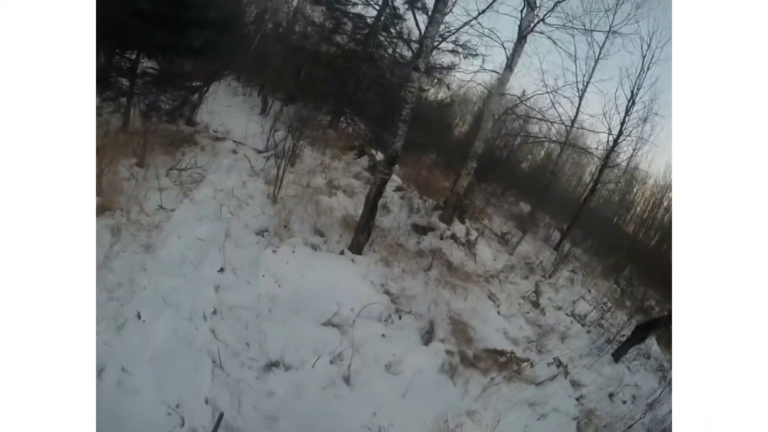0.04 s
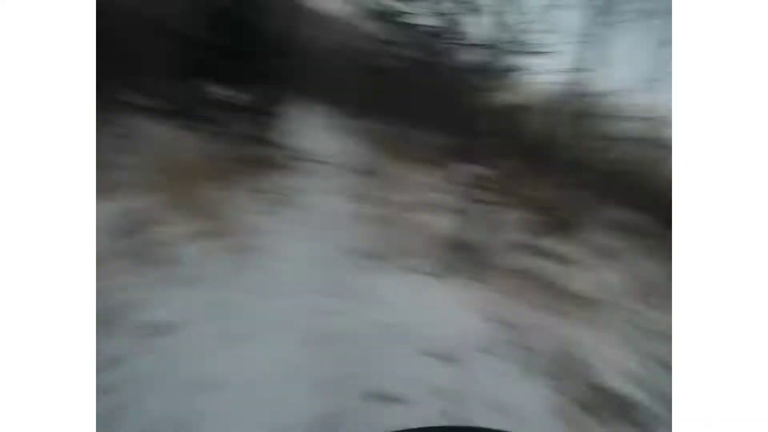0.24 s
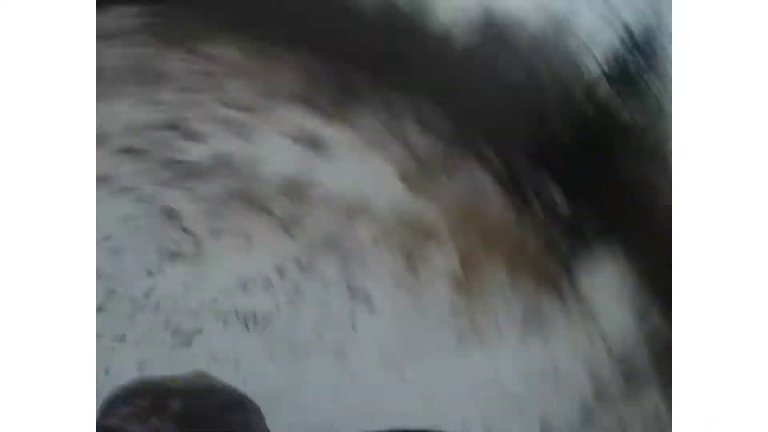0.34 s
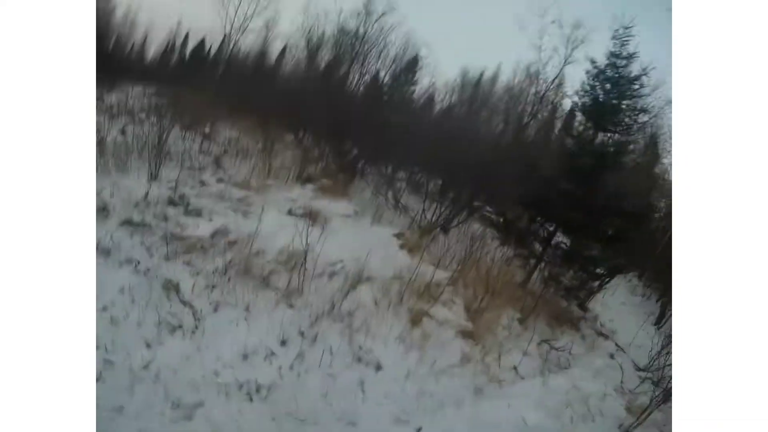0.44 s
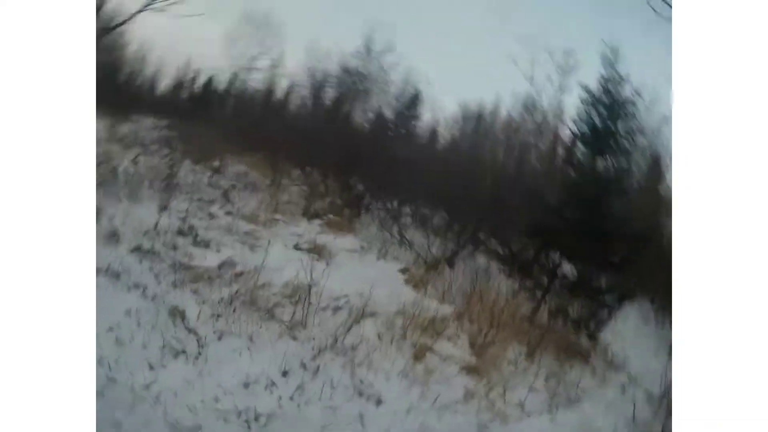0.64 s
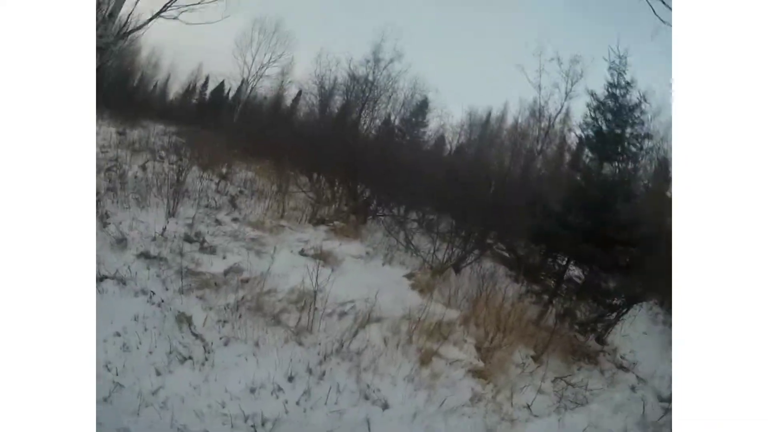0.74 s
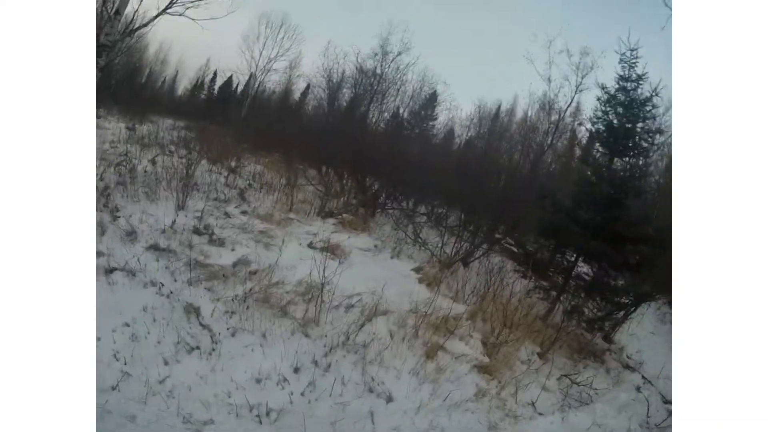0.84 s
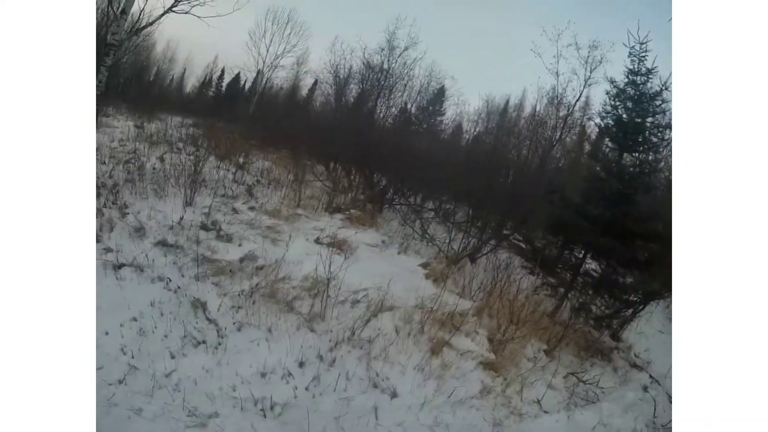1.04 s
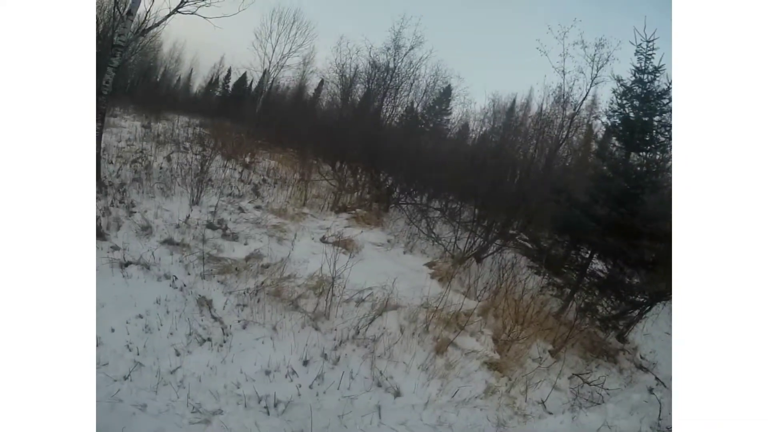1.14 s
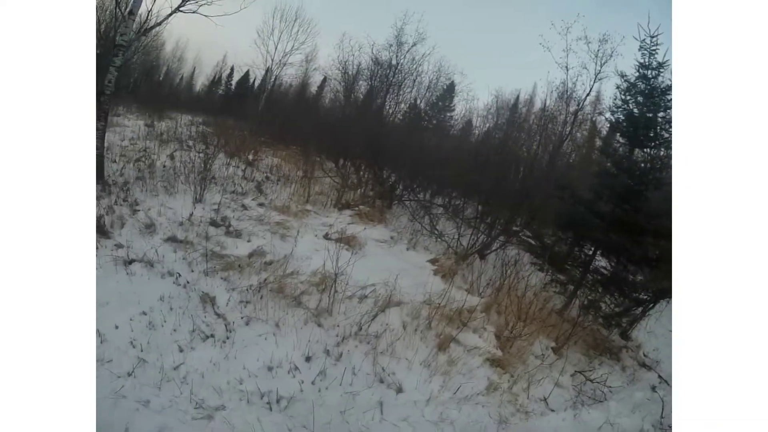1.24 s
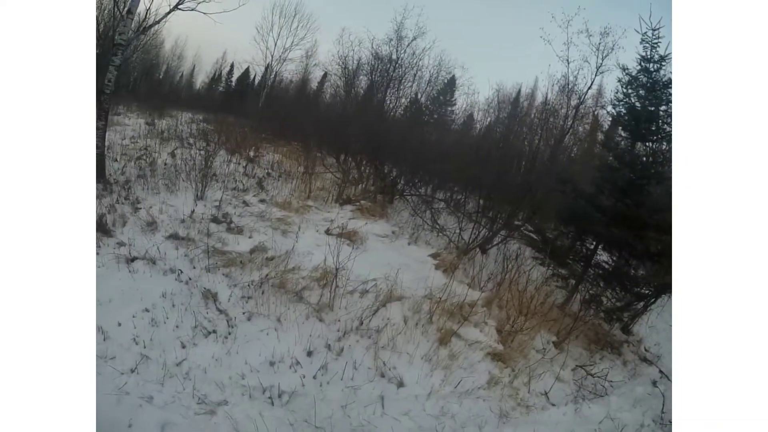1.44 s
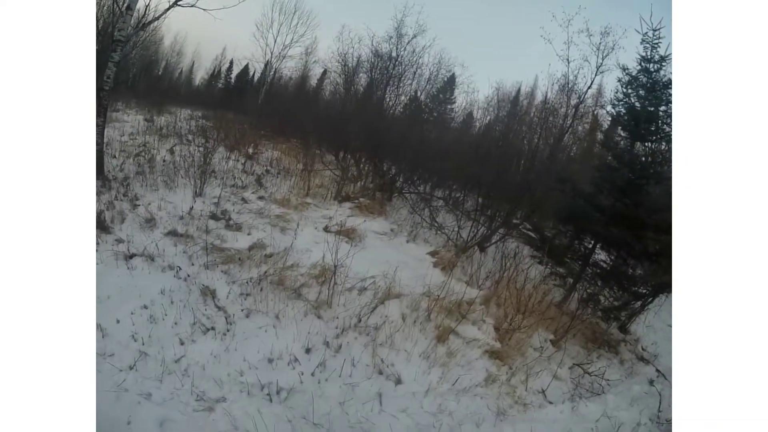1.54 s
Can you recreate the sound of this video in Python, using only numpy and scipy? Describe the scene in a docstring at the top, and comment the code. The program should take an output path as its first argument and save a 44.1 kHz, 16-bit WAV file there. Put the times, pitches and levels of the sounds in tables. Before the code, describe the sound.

Camera handling noise, right at the microphone, outdoors with no echo. Over a soft air rumble, rubbing on the plastic case swells at about 0.2 seconds with a knock and low thumps. One sharp click snaps at 0.3 seconds, with a faint chatter after it. Softer knocks and scuffs follow from 0.4 to 0.7 seconds and fade by 0.9, leaving faint wind hiss and rumble until about 1.6 seconds.

```python
"""A low rumble of air comes first, as a hand-held camera is swung round on a snowy woodland trail.
Something rubs and knocks on its plastic case, and the swing shoves the microphone into low thumps.
A hard part snaps once, sharply, with a second contact just after and a faint chatter.
The handling dies away within a second, leaving a faint hiss of wind over the soft rumble."""
import sys
import numpy as np
from scipy import signal
from scipy.fft import rfft, irfft
from scipy.io import wavfile

SR = 44100
rng = np.random.default_rng(int(sys.argv[2]) if len(sys.argv) > 2 else 0)


def generate_wav(sig):
    """Save sig (samples, or channels by samples) to the path in sys.argv[1] as 16-bit PCM at SR."""
    pcm = np.round(np.clip(np.atleast_2d(sig).T, -1, 1) * 32767).astype(np.int16)
    wavfile.write(sys.argv[1], SR, pcm)


N = 70560
TIME = np.arange(N) / SR


def from_db(db):
    """Decibels to gain."""
    return 10 ** (np.asarray(db) / 20)


def unit_rms(x):
    """Scale to rms 1."""
    return x / np.sqrt(np.mean(x ** 2) + 1e-20)


def envelope(rows):
    """Gain over time from rows of t/s, level/dB."""
    return from_db(np.interp(TIME, *np.transpose(rows)))


def coloured(noise, spectrum):
    """EQ a steady noise with rows of f/Hz, level/dB, then scale to rms 1."""
    hz, db = np.transpose(spectrum)
    bins_hz = np.maximum(np.fft.rfftfreq(N, 1 / SR), 1)
    eq = from_db(np.interp(np.log(bins_hz), np.log(hz), db))
    return unit_rms(irfft(rfft(noise) * eq, N))


def band(x, low_hz, high_hz, order=2):
    """High-pass, then low-pass."""
    for hz, kind in ((low_hz, "high"), (high_hz, "low")):
        x = signal.sosfilt(signal.butter(order, hz, kind, fs=SR, output="sos"), x + 1e-18)
    return x


def softened(x, band_hz):
    """A soft contact wakes only one band of the modes."""
    return signal.sosfilt(signal.butter(2, band_hz, "band", fs=SR, output="sos"), x + 1e-18)


def struck(start, modes):
    """Decaying sines of alternating sign, set off by one blow."""
    age = np.maximum(TIME - start, 0)
    ring = 0
    for k, (hz, db, t60) in enumerate(modes):
        decay = np.exp(-np.log(1000) * age / t60)
        ring += (-1) ** k * from_db(db) * decay * np.sin(2 * np.pi * hz * age)
    return ring


# swells of air on the microphone: t/s, level/dB
RUMBLE_ENVELOPE = [(0, -49), (0.09, -66), (0.17, -55.5), (0.25, -39), (0.34, -49), (0.47, -47.5),
                   (0.53, -57), (0.63, -54), (0.70, -46.5), (0.78, -58), (0.94, -53.5), (1.1, -64.5),
                   (1.28, -62.5), (1.4, -52), (1.6, -56.5)]
# their sub-heavy tone: f/Hz, relative level/dB
RUMBLE_EQ = [(5, -13), (14, 1.5), (25, -9), (45, -18), (80, -32.5), (160, -43.5), (400, -68.5)]


def air_rumble():
    """Air rumbles on the moving microphone."""
    return envelope(RUMBLE_ENVELOPE) * coloured(rng.standard_normal(N), RUMBLE_EQ)


# the wind bed: t/s, level/dB
HISS_ENVELOPE = [(0, -65.5), (0.25, -67.5), (0.45, -71.5), (0.75, -68.5), (1.05, -66.5), (1.37, -66),
                 (1.6, -66.5)]
# its broad tone, rolling off toward the top: f/Hz, relative level/dB
HISS_EQ = [(35, -33), (60, -1.5), (138, -1.5), (214, -2.5), (302, -3.5), (469, -5.5), (1630, -12.5),
           (2010, -11.5), (12800, -30.5), (15000, -35.5)]


def wind_hiss():
    """Wind lays a faint, nearly even hiss under everything."""
    return envelope(HISS_ENVELOPE) * coloured(rng.standard_normal(N), HISS_EQ)


# shoves on the microphone: t/s, level/dB, f/Hz
SHOVES = [(0.019, -41.5, 28), (0.242, -29, 24), (0.251, -39, 110), (0.283, -33, 55), (0.350, -38.5, 70),
          (0.374, -33.5, 36)]


def thumps():
    """Each shove is one smooth swing of pressure with a rebound on either side."""
    pressure = 0
    for centre, db, hz in SHOVES:
        phase_squared = (np.pi * hz * (TIME - centre)) ** 2
        pressure += from_db(db) * (1 - 2 * phase_squared) * np.exp(-phase_squared)
    return pressure


# strength of the rubbing on the case: t/s, level/dB
RUB_ENVELOPE = [(0, -97), (0.09, -75.5), (0.15, -69.5), (0.19, -65.5), (0.222, -43.5), (0.266, -38.5),
                (0.292, -57.5), (0.325, -47.5), (0.352, -48.5), (0.38, -62.5), (0.42, -56.5), (0.465, -72),
                (0.525, -54), (0.595, -68.5), (0.662, -57), (0.705, -71), (0.73, -64), (0.85, -80.5)]
# its hollow plastic tone: f/Hz, relative level/dB
RUB_EQ = [(100, -6), (230, -7.5), (450, -16), (700, -12.5), (850, -16.5), (1250, -12.5), (1520, -6.5),
          (1680, 1.5), (1960, -10.5), (2350, -6), (3300, -16), (3900, -21), (4500, -19), (6500, -25.5),
          (8000, -38.5), (12200, -37), (15500, -50.5)]


def rubbing(slips_per_s=1500, spread_db=2, smooth_share=0.37, fade_db_per_s=30):
    """Tiny slips and smooth friction, coloured by the case; brighter when harder, then fading out."""
    sizes = from_db(spread_db * np.minimum(rng.exponential(1, N), 3)) * rng.choice([-1, 1], N)
    slips = unit_rms(sizes * (rng.random(N) < slips_per_s / SR))
    texture = np.sqrt(1 - smooth_share) * slips + np.sqrt(smooth_share) * rng.standard_normal(N)
    friction = coloured(texture, RUB_EQ)
    tail_s = np.maximum(TIME - RUB_ENVELOPE[-1][0], 0)
    strength = envelope(RUB_ENVELOPE) * from_db(-fade_db_per_s * tail_s)
    treble = signal.sosfiltfilt(signal.butter(2, 6000, "high", fs=SR, output="sos"), friction)
    brightness = (strength / strength.max()) ** 0.32   # 0.32 dB more treble per dB of strength
    return strength * (friction - treble + treble * brightness)


def crackle(peak_ticks_per_s=160):
    """Under firm rubbing, fibres catch now and then and let go with tiny bright ticks."""
    strength = envelope(RUB_ENVELOPE)
    caught = rng.random(N) < peak_ticks_per_s * strength / strength.max() / SR
    sizes = rng.choice([-1, 1], N) * rng.uniform(0.2, 1, N)
    ticks = sizes * caught * np.sqrt(SR / peak_ticks_per_s)
    return from_db(-19) * strength * band(ticks, low_hz=5000, high_hz=11000)


# short bright brushes and ticks, including the snapping part's rebound: t/s, level/dB, half length/s
LIGHT_TOUCHES = [(0.15, -68, 0.032), (0.24, -53, 0.0027), (0.3100, -47, .0006), (0.552, -69, 0.0037),
                 (0.575, -70, 0.0011), (0.666, -69.5, 0.0092), (0.90, -78, 0.094)]
# their crisp tone: f/Hz, relative level/dB
TOUCH_EQ = [(1200, -16), (3000, 5), (5800, 3), (8200, -7), (10300, -9), (15000, -20.5)]


def brushes_and_ticks():
    """Each light touch is a short, bright swell of noise; the briefest sound as ticks."""
    swells = sum(from_db(db) * np.exp(-((TIME - centre) / half_s) ** 2)
                 for centre, db, half_s in LIGHT_TOUCHES)
    return swells * coloured(rng.standard_normal(N), TOUCH_EQ)


# dull hits on the case: t/s, level/dB, low cut/Hz, high cut/Hz
CASE_HITS = [(0.2335, -15.5, 959.8, 1920), (0.3747, -39.5, 150, 2000), (0.5266, -23.5, 90, 2310),
             (0.574, -31.5, 100, 330), (0.6472, -40, 1350, 2580)]
# the ring of the case: f/Hz, relative level/dB, t60/s
CASE_RING = [(210, -19.5, 0.013), (670, -11, 0.031), (1030, -11.5, .022), (1377, -4, 0.0088),
             (1680, -3, .016), (1894, -7.5, .013), (2130, -13, .01), (2500, -18.5, .016)]


def knocks():
    """Soft blows ring the case, each filtered to its own dullness."""
    return sum(from_db(db) * band(struck(start, CASE_RING), low_hz, high_hz, order=4)
               for start, db, low_hz, high_hz in CASE_HITS)


# the ring of the snapping part: f/Hz, level/dB, t60/s
PART_RING = [(215, -24, .012), (692, -25.5, .035), (702.5, -5, .0081), (978, 2, .0032),
             (1250, -12.5, .0067), (1902, -10, 0.056), (1956, -4.5, .0224), (2271, -13, 0.071),
             (2460, -7.5, 0.011), (3030, -9, .0079), (3780, -20.5, .0119), (4682, -23.5, .01),
             (5284, -25.5, .013), (6353, -24.5, 0.0085)]
# the short, bright top of its crack: f/Hz, level/dB, t60/s
CRACK_RING = [(4950, -42, .04), (6150, -34.5, .013), (7240, -34, .007), (8320, -33, .008),
              (9200, -31, 0.0066), (10600, -36.5, .007), (12400, -41, .006), (14000, -39, .007)]
# its faint after-taps: t/s, relative level/dB
CHATTER_TAPS = [(0.3094, -28), (0.3455, -34.5), (0.3545, -37.5)]


def snap(snap_s=0.30140, seat_s=0.30371):
    """A bright crack rings the hard part; a softer contact follows as it seats, then a faint chatter."""
    crack = struck(snap_s, PART_RING) + struck(snap_s, CRACK_RING)
    seat = from_db(-4.2) * softened(struck(seat_s, PART_RING), band_hz=(1263, 2265))
    taps = sum(from_db(db) * struck(start, PART_RING) for start, db in CHATTER_TAPS)
    return crack + seat + softened(taps, band_hz=(2100, 3200))


def scene():
    """A mono mix with everything right at the microphone, in open air without echo."""
    handling = thumps() + rubbing() + crackle() + brushes_and_ticks() + knocks() + snap()
    return (air_rumble() + wind_hiss() + handling)[None]


def record(dry, cutoff_hz=15900):
    """A steep high cut takes off the very top."""
    return signal.sosfilt(signal.ellip(10, 0.1, 80, cutoff_hz, fs=SR, output="sos"), dry)


dry = scene()
out = record(dry)
generate_wav(out)
```